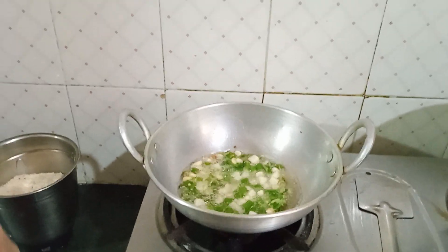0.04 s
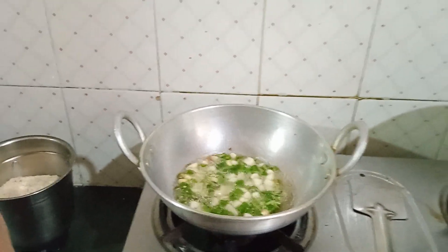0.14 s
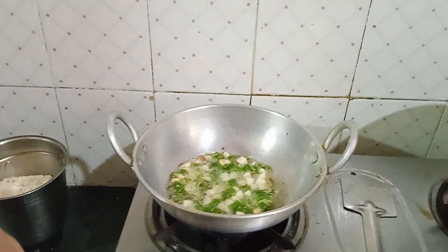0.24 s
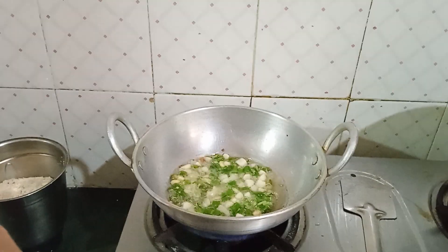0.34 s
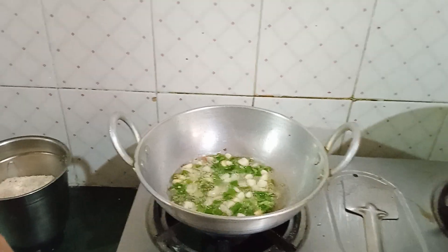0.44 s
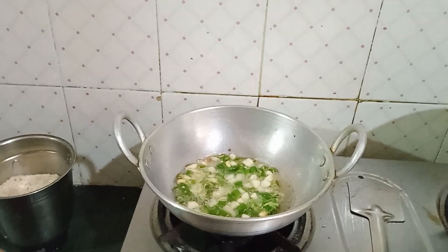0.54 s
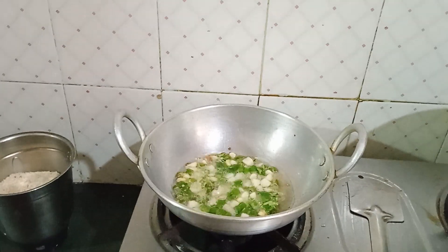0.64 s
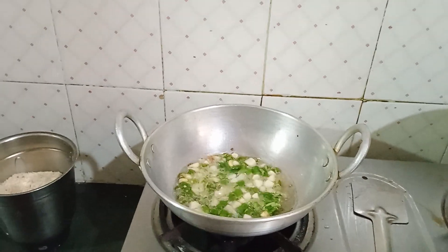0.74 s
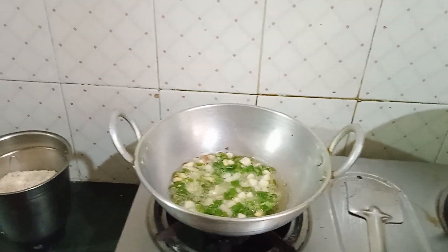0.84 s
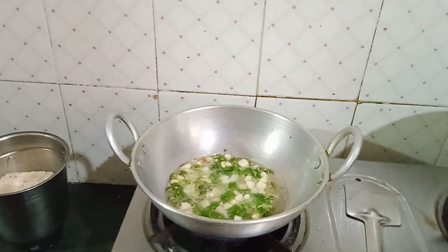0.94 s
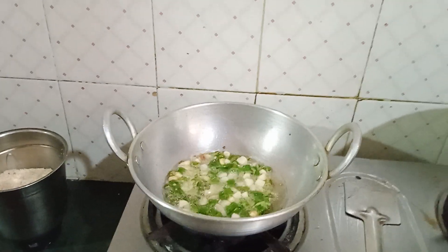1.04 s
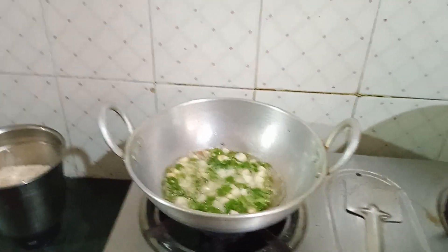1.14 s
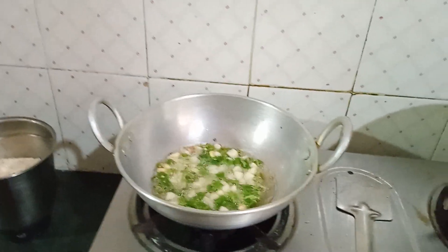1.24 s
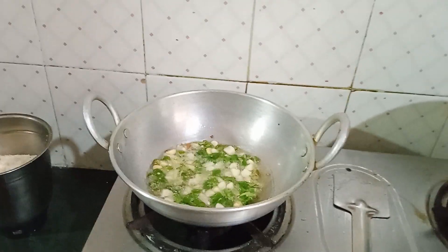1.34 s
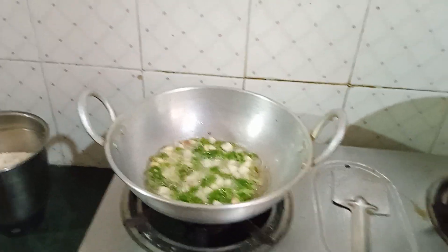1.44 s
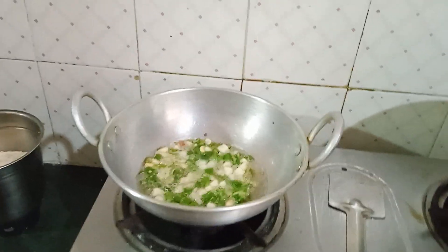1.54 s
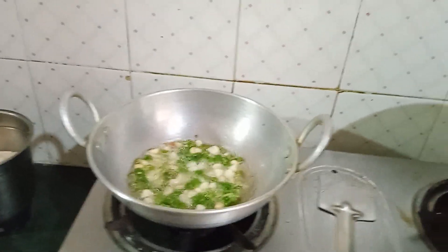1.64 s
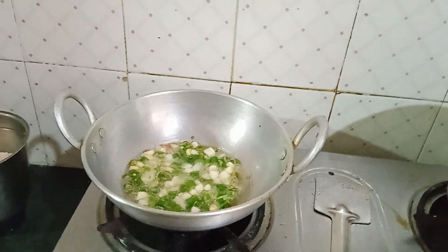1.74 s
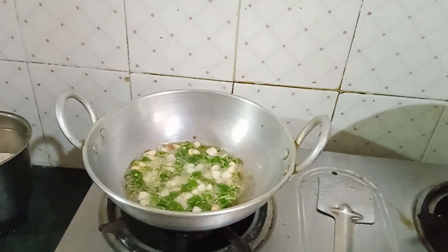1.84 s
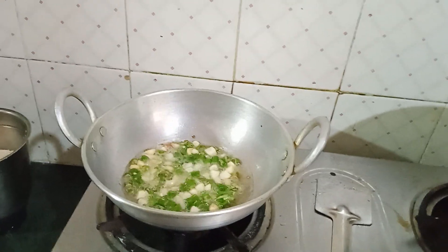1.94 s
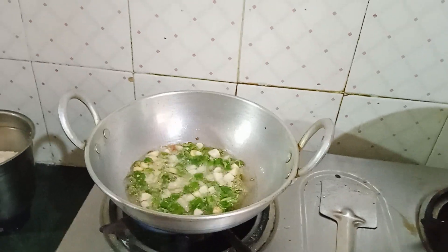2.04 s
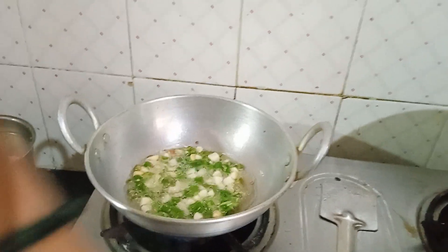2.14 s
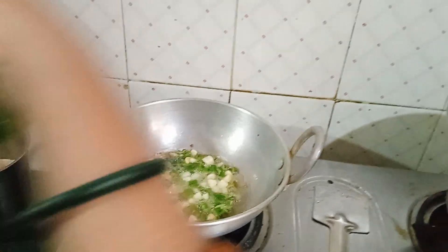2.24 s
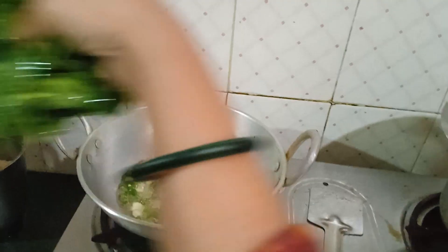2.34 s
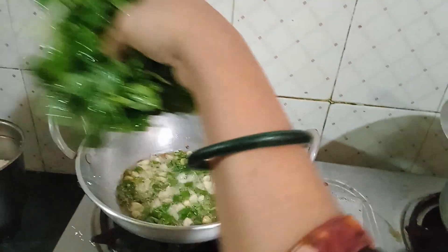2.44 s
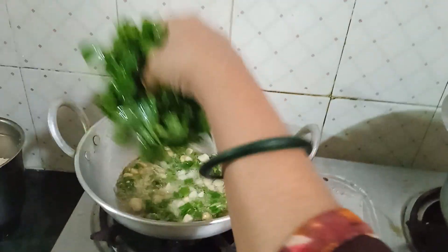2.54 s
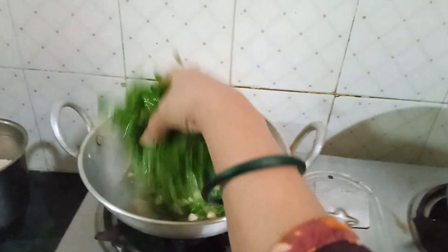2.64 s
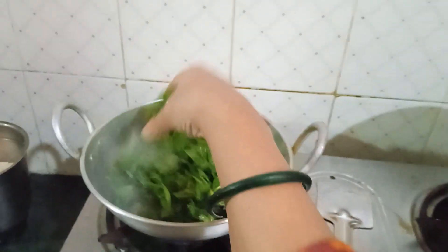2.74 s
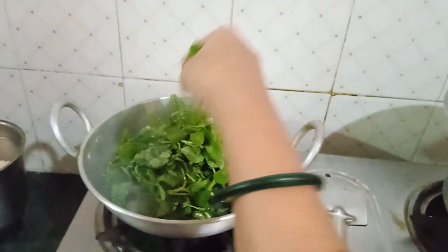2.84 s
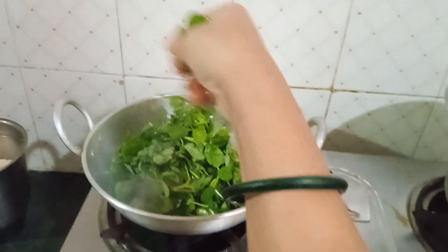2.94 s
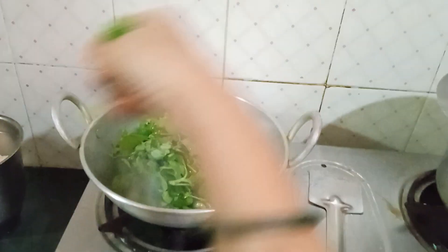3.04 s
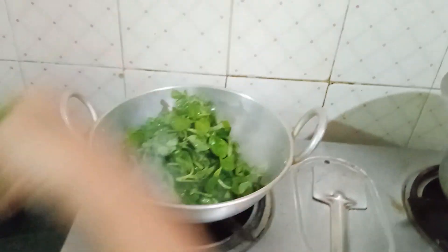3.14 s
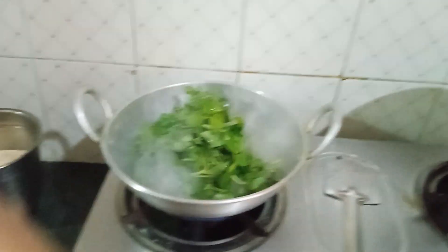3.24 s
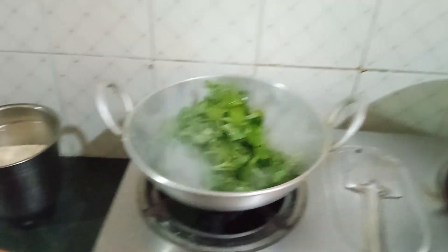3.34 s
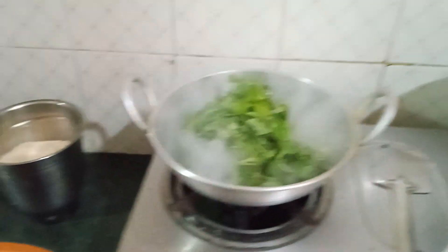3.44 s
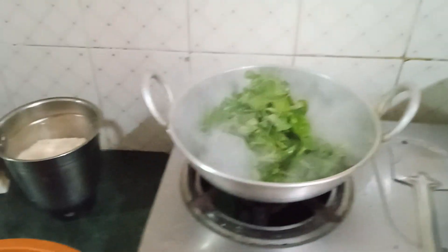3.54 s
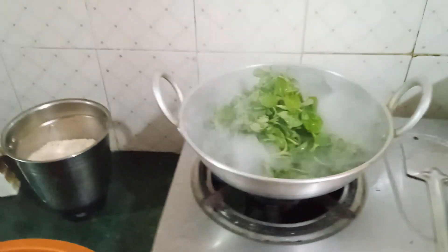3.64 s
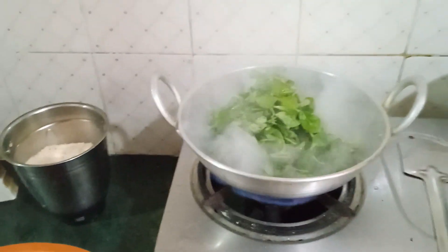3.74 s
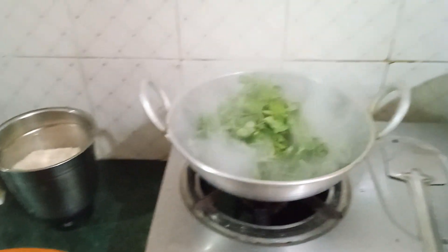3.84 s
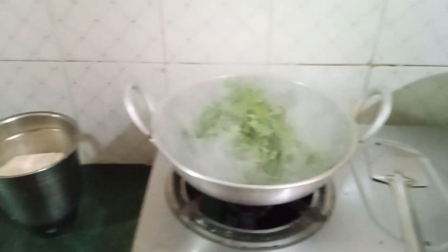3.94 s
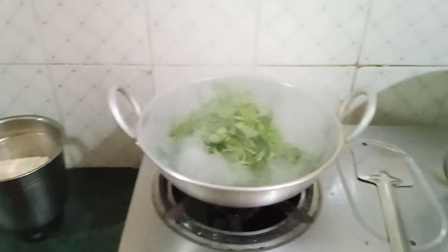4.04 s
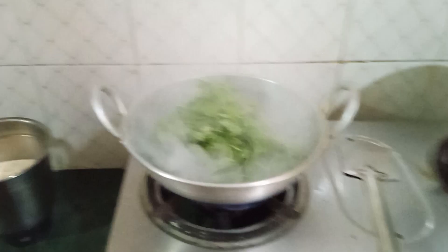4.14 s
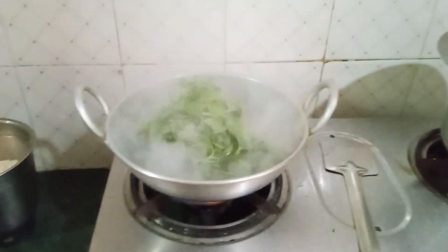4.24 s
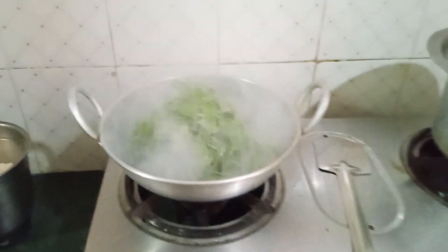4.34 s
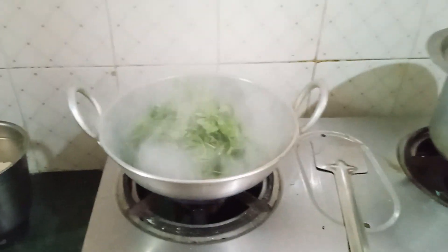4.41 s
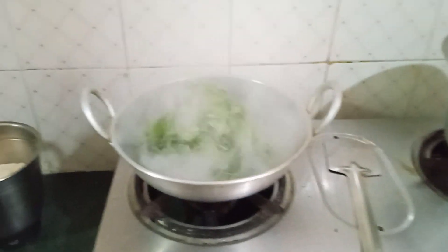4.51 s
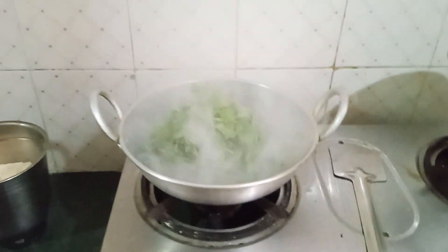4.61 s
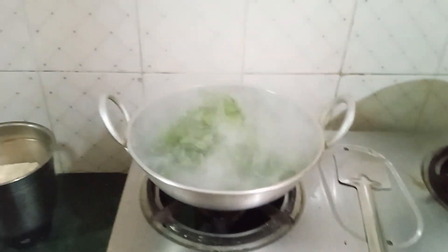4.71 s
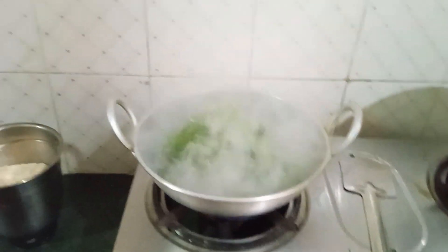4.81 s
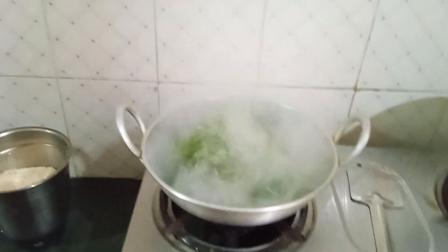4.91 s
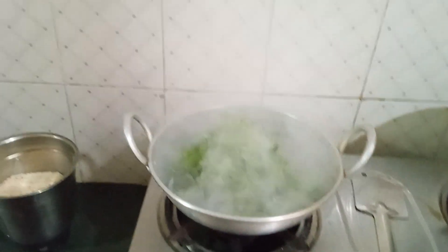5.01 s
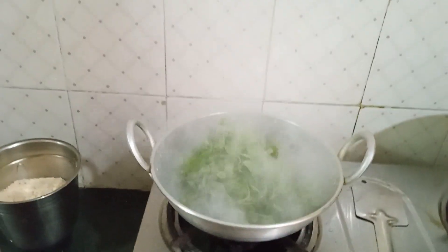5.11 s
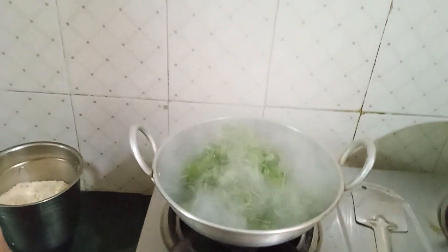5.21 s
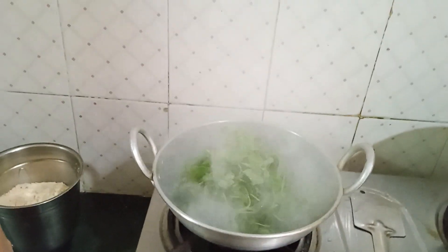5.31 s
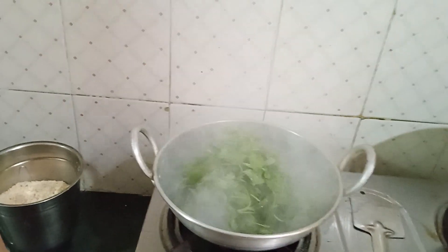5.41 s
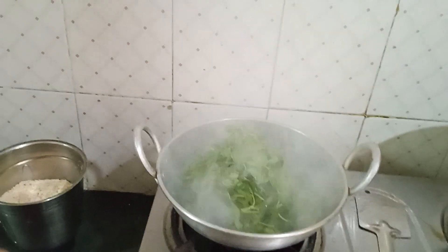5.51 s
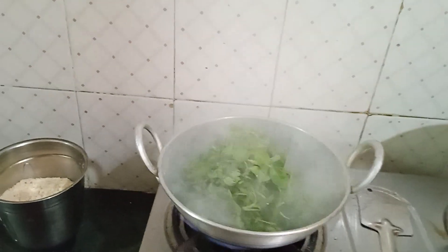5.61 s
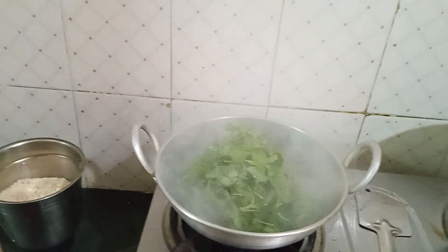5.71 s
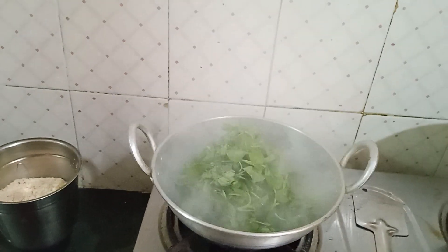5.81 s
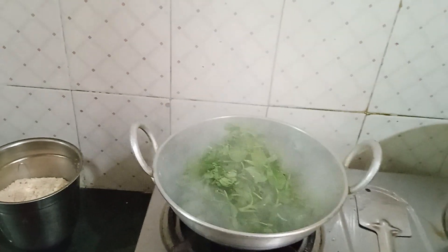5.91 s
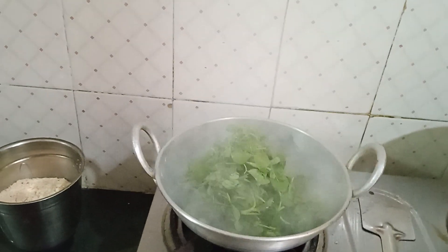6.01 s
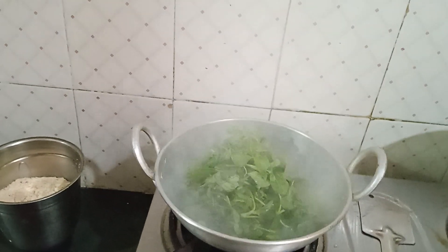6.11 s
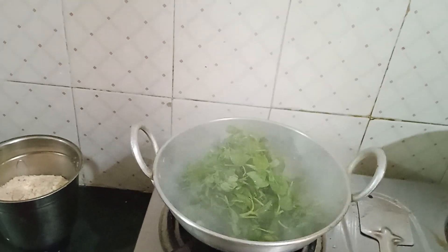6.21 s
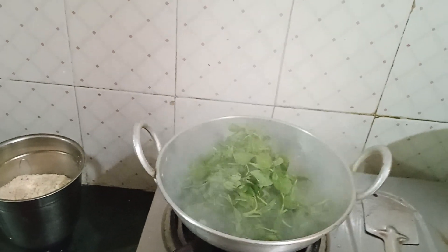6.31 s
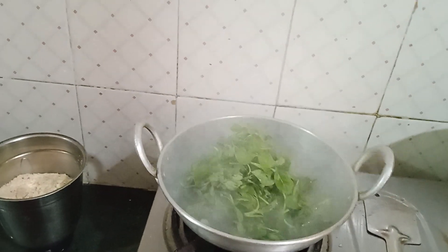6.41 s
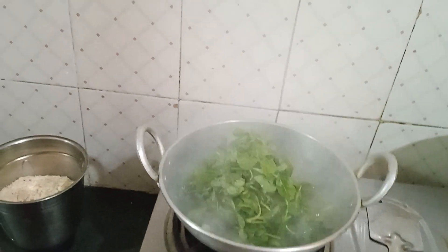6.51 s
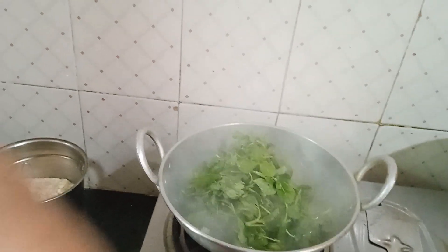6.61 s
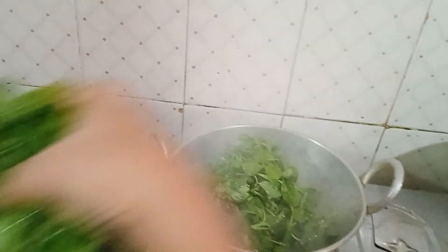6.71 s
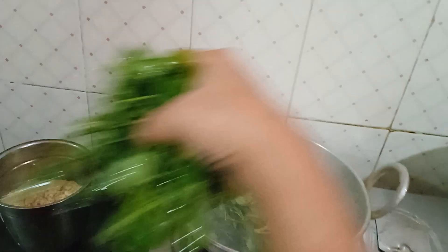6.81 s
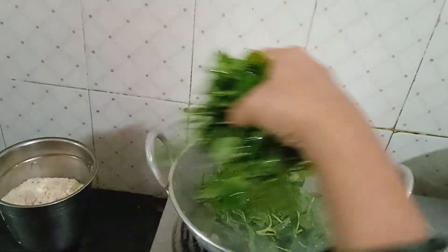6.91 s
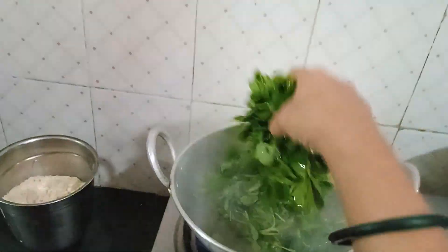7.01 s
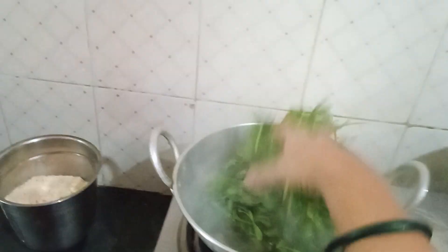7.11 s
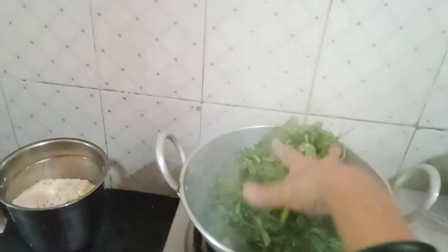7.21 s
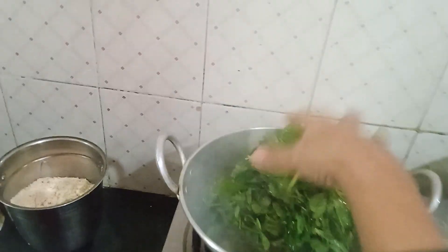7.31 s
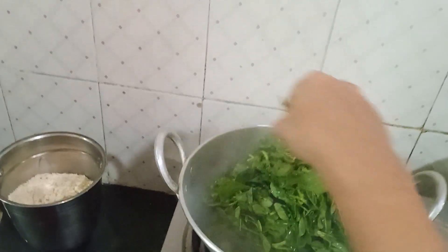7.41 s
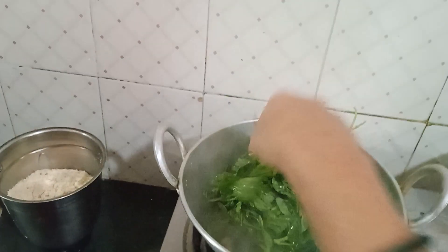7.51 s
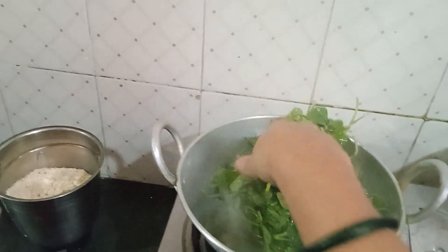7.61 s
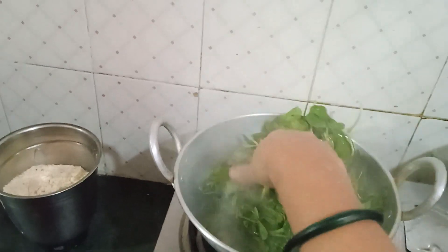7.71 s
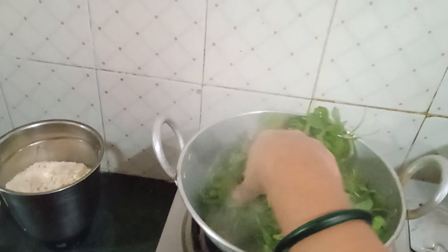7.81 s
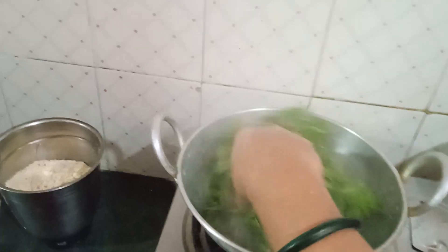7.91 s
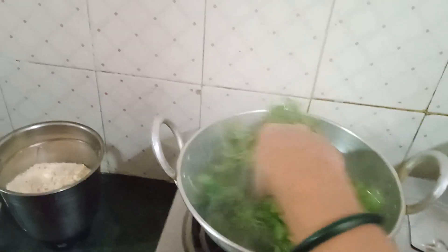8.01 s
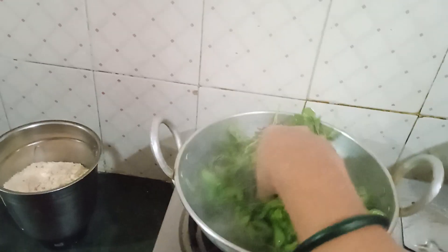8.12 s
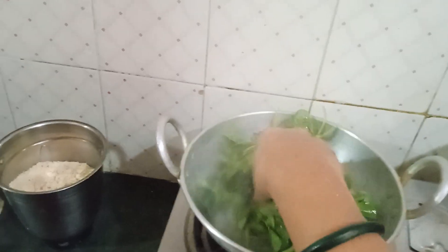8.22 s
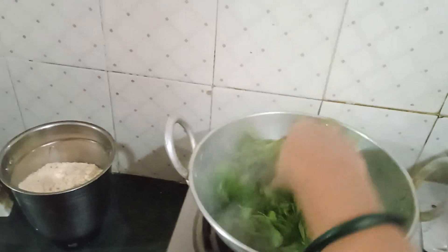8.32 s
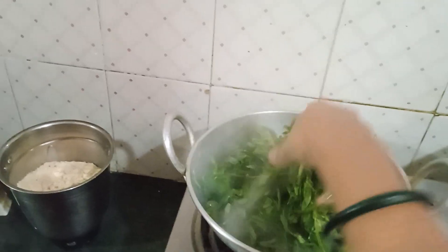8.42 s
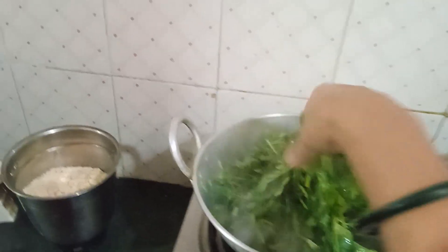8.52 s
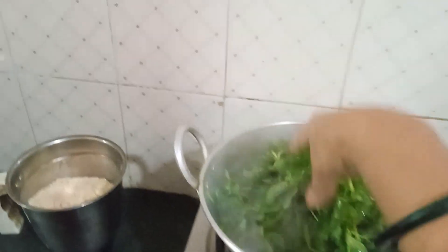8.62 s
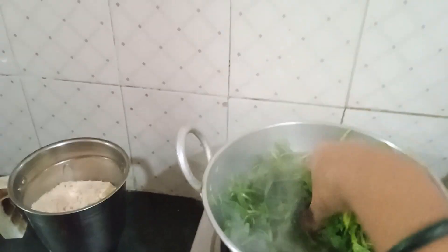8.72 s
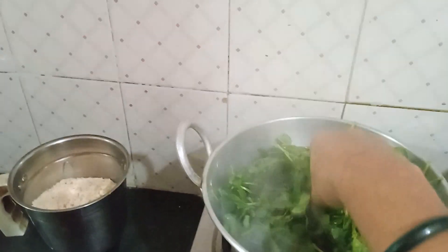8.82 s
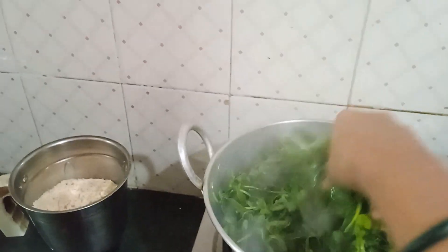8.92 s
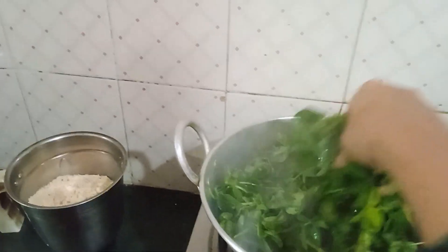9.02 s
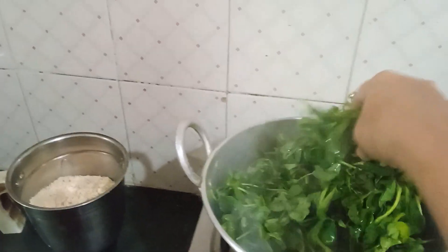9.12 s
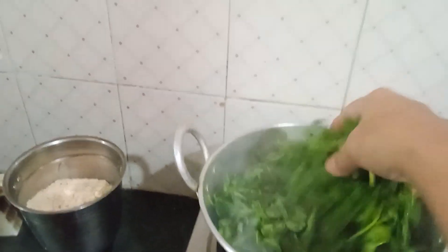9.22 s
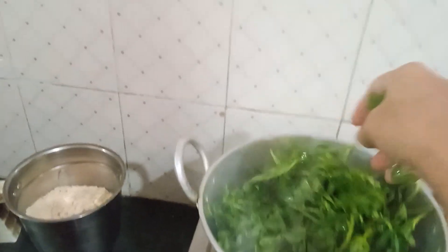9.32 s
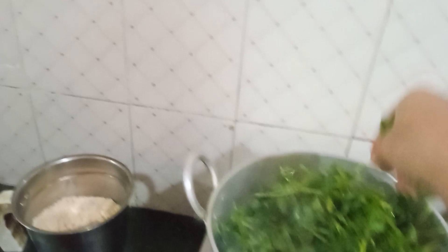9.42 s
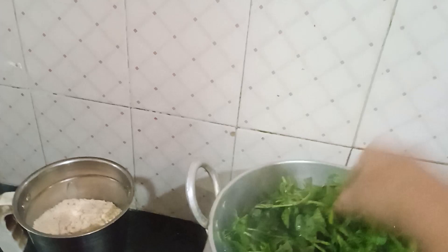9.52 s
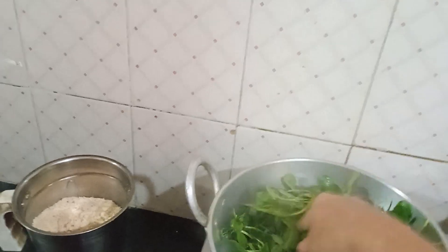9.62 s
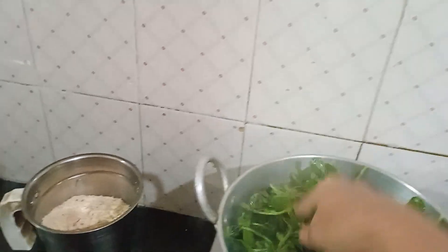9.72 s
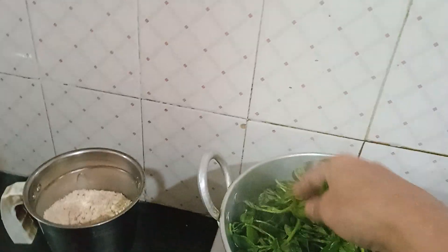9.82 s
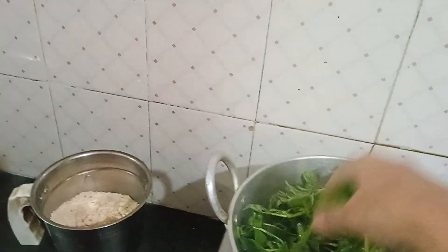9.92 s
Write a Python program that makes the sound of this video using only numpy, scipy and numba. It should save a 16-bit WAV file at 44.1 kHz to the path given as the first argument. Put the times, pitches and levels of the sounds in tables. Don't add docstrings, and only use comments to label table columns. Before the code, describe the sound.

A phone microphone sits close to a metal pan in a tiled kitchen, with a faint low motor droning far off. From 0 to 2.5 seconds, chopped aromatics simmer quietly in hot oil, with small bubbles, fine ticks and sharp spits; a dense crackling flurry bursts around 0.45 to 0.65. At about 2.6, wet leaves drop in: a bright, fine spray of steam surges up, becoming a fuller, loud sizzling roar by 3.2. It gradually settles through 6.6 into steady, grainy frying, with soft low bubbles near 5.4 and 5.7. Around 6.75 a second heap briefly dulls the sizzle, leaving it denser and more muffled. A short steam hiss comes at 7.2, then distinct pops near 7.5, 7.9 and 9.5, with faint metallic hums as a hand jogs the pan. Frying continues steadily to 10 seconds.

```python
import sys
import numpy as np
from scipy import signal
from scipy.fft import rfft, irfft, next_fast_len
from scipy.io import wavfile
from scipy.ndimage import uniform_filter1d, map_coordinates
from numba import njit

SR = 44100
rng = np.random.default_rng(int(sys.argv[2]) if len(sys.argv) > 2 else 0)


def unload_wav(signal):
    wavfile.write(
        sys.argv[1],
        SR,
        np.round(np.clip(np.atleast_2d(signal).T, -1, 1) * 32767).astype(np.int16),
    )


def elevation(decibels):
    levels = np.asarray(decibels, float)
    return 10 ** (levels / 20)


N = 438794

# time in seconds, share of first leaves 0-1, share of the heaped pan 0-1
LOAD = [
    (0, 0, 0),
    (2.56, 0, 0),
    (2.68, 1, 0),
    (6.64, 1, 0),
    (6.78, 0, 1),
    (10, 0, 1),
]
# time in seconds, vigour in dB, fineness in dB
BOIL = [(0, -55, -1.5), (.6, -53, 0), (1.3, -55.5, -0.5), (2, -53.5, 1), (2.4, -56.5, -2), (2.56, -54.5, 0),
        (2.72, -42.5, 7.5), (2.8, -36, 7), (3, -33, 7), (3.18, -28.5, 2), (3.42, -30, 0.5),
        (3.85, -31.5, -0.5), (4.5, -33.5, .8), (5.6, -35, 1.5), (6.66, -36, 0.5), (7.3, -35, 0.6),
        (8.1, -36, 1), (9.95, -36.5, -1)]
# frequency in Hz, level in dB per Hz
SIMMER = [(330, -37), (560, -10), (762, -21), (995, -13.5), (1220, -7.5), (1590, -4), (2050, -4),
          (2250, -2), (3950, -4), (4830, -3), (6930, -1), (9810, -18), (13700, -15)]
FRESH = [(330, -32.5), (560, -20), (703, -23), (906, -13.5), (995, -8), (1180, -12), (1470, -5), (1750, -6),
         (2220, 0), (4000, -5), (7210, -4), (9170, -14), (13700, -11.5)]
HEAPED = [(330, -57), (560, -23.5), (684, -19.5), (762, -18.5), (969, -6), (1230, -7.5), (1390, -7),
          (1630, -4.5), (2110, -0.5), (4220, -5.5), (6930, -6.5), (9290, -20), (13700, -20.5)]
# frequency in Hz, width in Hz, level in dB above the colour
BOWL_BARE = [(1007, 75, 10.5), (1630, 66, 4.5), (1880, 84, 2.5), (2560, 100, 5), (3290, 140, -31)]
BOWL_FRESH = [(1080, 220, -2.5), (1570, 170, 5), (2230, 200, -1.5), (2890, 230, -1), (3680, 140, -1.5)]
BOWL_HEAPED = [(1397, 37, 6), (1470, 64, 5), (2070, 140, 1.5), (2630, 270, 2), (3270, 740, -1)]
# frequency in Hz, width in Hz, level in dB above the colour
WALL = [(687, 9, 13.5), (973, 12, 4.5), (832, 20, 3), (1352, 14, 2), (745, 20, 2)]
RANGE_EDGES_HZ = (3500, 8200, 13900)
BARE_DB = [-1.05, -1.5, -6, -16]
FRESH_DB = [0.1, -2, -9.5, -15]
HEAPED_DB = [-0.1, -5.5, -8.5, -14]
FINENESS_LEAN = [0, .7, .9, 1.4]
# start in seconds, length in seconds, pitch in Hz, width in Hz, level in dB
JETS = [(0.36, .1, 2600, 3100, -55), (0.58, .05, 2600, 1600, -54), (0.974, .006, 6100, 8000, -40.5),
        (1.5, .015, 6100, 2200, -42), (2.605, .15, 4800, 700, -45.5), (2.652, 0.18, 2600, 790, -42),
        (2.61, 0.12, 6600, 1200, -43), (7.209, 0.11, 3700, 1000, -35.5), (7.215, 0.055, 9400, 10000, -35.5),
        (2.84, .25, 2900, 1800, -40), (2.775, .12, 8700, 8500, -37), (2.94, .4, 6000, 2300, -33.5),
        (.39, 0.059, 4500, 6000, -46), (7.914, 0.017, 1900, 1200, -37)]
# time in seconds, peak in dB, pitch in Hz
SPITS = [(0.0523, -34, 2600), (0.0902, -34, 3220), (0.203, -33, 6390), (0.281, -35, 3120),
         (0.2927, -30, 3760), (0.413, -30, 2780), (0.783, -38, 2580), (0.7884, -36, 2380),
         (.8885, -39, 8000), (0.975, -41, 1660), (1.0093, -31, 6450), (1.0824, -34, 1140),
         (1.1667, -38, 7400), (1.3247, -31, 6050), (1.4167, -38, 5550), (1.4296, -42, 6300),
         (1.5564, -34, 7100), (1.6224, -33, 2770), (1.67, -34, 6070), (1.874, -29, 5000),
         (1.8803, -29, 4860), (2.0493, -38, 2470), (2.4069, -37, 6600), (2.5817, -36, 6800),
         (2.6095, -32, 4670), (2.6184, -37, 6900), (7.4768, -18, 2470), (7.9115, -15, 1900),
         (9.5226, -21, 2380)]
# time in seconds, peak in dB, pitch in Hz
FLURRY = [(0.455, -34, 4900), (0.494, -21.5, 6800), (.4945, -26, 4300), (0.5027, -26, 3270),
          (0.532, -28, 5910), (0.5437, -27, 7050), (0.549, -20.5, 3900), (0.5664, -30, 7300),
          (0.583, -29, 1630), (0.601, -33, 3110), (0.615, -20, 3100), (0.627, -28.5, 1690),
          (0.6374, -31, 2230), (0.66, -33, 2780)]
# time in seconds, peak in dB
MIST_TICKS = [(0.3446, -42), (0.395, -42), (0.5826, -34), (0.625, -38), (0.8485, -46), (0.8639, -34),
              (0.9757, -36), (1.04, -45), (1.5768, -41), (1.7789, -36), (1.95, -39), (2.0238, -42)]
# time in seconds, peak in dB, pitch in Hz, t60 in seconds
GULPS = [(0.245, -45, 1150, 0.028), (0.428, -44, 974, 0.03), (0.515, -37, 736, 0.038),
         (0.535, -38, 759, 0.027), (0.548, -42, 770, 0.026), (0.564, -46, 780, 0.023),
         (0.592, -39, 815, 0.037), (0.763, -45, 842, 0.03), (0.825, -47, 1040, 0.03),
         (1.082, -40.5, 1190, 0.025), (5.409, -31.5, 920, 0.026), (5.724, -29.5, 765, 0.044)]
# time in seconds, level in dB
NUDGES = [(7.085, -46), (7.5, -49), (7.815, -44), (7.865, -39), (7.97, -41), (8.85, -52), (9.5, -46)]
# frequency in Hz, level in dB per Hz
KITCHEN = [(18, -42), (30, -20), (108, -1), (194, -3), (230, -0.5), (328, -4.5), (423, -6.5), (495, -3.5),
           (717, -8.5), (900, -2), (1170, -21), (1980, -120)]
# frequency in Hz, width in Hz, level in dB above the rumble
MOTOR = [(84, 10, 7), (103.8, 4.8, 12), (156, 6.4, -8), (174, 10, 6.5), (187.6, 7.5, 10),
         (202.7, 5.4, 13.5), (267, 9, 0), (313.4, 6.8, 9), (343, 14, 8.5), (429, 15.4, 11)]
# frequency in Hz, level in dB
HUM = [(486, -72), (522.5, -71)]
# frequency in Hz, t60 in seconds
TILES = [(500, 0.35), (3000, 0.18), (12000, 0.041)]
# frequency in Hz, gain in dB
PORT = [(13700, 0), (14000, 1), (14300, 5), (14900, 9), (15710, 11), (15770, -25), (15900, -70)]
# centre in seconds, low edge in Hz, high edge in Hz, level in dB
FILLS = [(2.835, 4600, 6400, -38), (3.348, 9600, 11300, -49), (3.372, 12500, 14000, -47),
         (4.252, 4600, 5900, -42), (4.622, 11700, 13300, -53), (4.718, 13800, 15700, -47),
         (5.695, 11000, 12500, -52), (5.833, 4160, 5300, -47), (5.833, 6900, 9000, -45),
         (5.833, 10300, 14000, -49), (6.458, 4130, 5200, -44.5), (6.692, 5050, 6460, -44),
         (6.692, 8900, 10500, -53), (8.108, 4600, 5900, -50), (9.314, 13000, 14700, -53),
         (9.338, 4600, 7100, -46), (9.432, 6740, 9800, -47), (9.71, 4600, 7800, -47),
         (9.782, 7500, 9050, -52), (9.782, 13800, 15300, -52)]

ARM_S, ARM_LENGTH_S, ARM_DB = 6.71, 0.16, -1.5
HAND_OFF_S, HAND_DB = 7.2, -0.84
FAINT_DB, FAINT_SPREAD_DB, FAINT_UNTIL_S = -49, 5, 2.3
SPATTER_DB, SPATTER_FALLS = -1.5, 0.37
NUDGE_T60_S, NUDGE_RISE_S = 0.16, 0.0075
KITCHEN_DB, ROAR_DB, SHADE_DB = -62, 4, -7
SWELL_S, SWELL_LENGTH_S, SWELL_DB = 4.12, 0.099, 4.5


def unit(x):
    return x / np.sqrt(np.mean(x ** 2, axis=-1, keepdims=True) + 1e-20)


def along(points, hz):
    f, v = np.transpose(points)
    return np.interp(np.log(hz + 1), np.log(f + 1), v)


def curves(rows):
    s, *columns = np.transpose(rows)
    return np.array([np.interp(np.arange(N) / SR, s, column) for column in columns])


def wobble(rate):
    knots = rng.standard_normal(int(N * rate / SR) + 4)
    return map_coordinates(knots, [np.arange(N) * rate / SR])


def peaked(spectrum, modes, hz):
    power = 1 + sum(elevation(2 * db) / (1 + (2 * (hz - centre) / width) ** 2) for centre, width, db in modes)
    return elevation(along(spectrum, np.minimum(hz, 13700))) * np.sqrt(power)


def coloured(x, gain):
    size = 2 ** 14
    cepstrum = irfft(np.log(gain(np.fft.rfftfreq(size, 1 / SR)) + 1e-6))
    cepstrum[1:size // 2] *= 2
    cepstrum[size // 2 + 1:] = 0
    return signal.fftconvolve(x, irfft(np.exp(rfft(cepstrum))))[:N]


def burst(length, low_hz, high_hz):
    hz = np.fft.rfftfreq(length, 1 / SR)
    inside = (hz > low_hz) & (hz < high_hz)
    return unit(irfft(rfft(rng.standard_normal(length)) * inside, length))


@njit
def add(out, s, hz, size, cycles):
    for i in range(len(s)):
        k = int(s[i] * SR)
        for j in range(min(int(5 * cycles[i] * SR / hz[i]), len(out) - k)):
            u = j * hz[i] / SR
            out[k + j] += size[i] * np.sin(2 * np.pi * u) * np.exp(-u / cycles[i]) * (1 - np.exp(-u))
    return out


def frying():
    fresh, heaped = curves(LOAD)
    vigour_db, fineness_db = curves(BOIL)
    t = np.arange(N) / SR
    since = np.clip(t - ARM_S, 0, 5) / ARM_LENGTH_S
    arm_db = ARM_DB * np.e * 2 * since * np.exp(-2 * since)
    covered = np.clip(np.minimum(since * ARM_LENGTH_S, HAND_OFF_S - t) / 0.018, 0, 1)
    vigour_db = vigour_db + HAND_DB * covered - 0.3 * arm_db
    fineness_db = fineness_db + arm_db

    bare = bubbles(count=8000, cycles=4.8, scatter_db=4.0, share=0.16, patch_db=1.6)
    wet = bubbles(count=40000, cycles=2.45, scatter_db=3.5, share=0.16, patch_db=1.0)
    full = bubbles(count=40000, cycles=4.9, scatter_db=6.5, share=0.15, patch_db=1.0)
    bare = coloured(bare, lambda f: peaked(SIMMER, BOWL_BARE, f))
    wet = coloured(wet, lambda f: peaked(FRESH, BOWL_FRESH + WALL, f))
    full = coloured(full, lambda f: peaked(HEAPED, BOWL_HEAPED + WALL, f))
    mix = np.sqrt(np.abs(1 - fresh - heaped)) * bands(bare, BARE_DB)
    mix += np.sqrt(fresh) * bands(wet, FRESH_DB)
    mix += np.sqrt(heaped) * bands(full, HEAPED_DB)

    surge_db = 0.1 * wobble(3.03) + 0.41 * wobble(9) + 0.5 * wobble(30) + 0.13 * wobble(90)
    flicker = np.array([1.2 * wobble(4) + wobble(14) + wobble(60) for _ in range(4)])
    own_db = [[0.3], [0.3], [0.35], [0.6]] * flicker
    level_db = vigour_db + np.outer(FINENESS_LEAN, fineness_db) + surge_db + own_db
    return np.sum(mix * elevation(level_db), axis=0)


def bubbles(count, cycles, scatter_db, share, patch_db):
    when, pitch, strength, ringing = rng.random((count, 4)).T
    hz = 600 * 27 ** pitch
    size = hz * elevation(scatter_db * np.sqrt(-np.log(1 - 0.998 * strength)))
    grains = add(np.zeros(N), when * N / SR, hz, size, cycles * (0.5 + ringing))
    share = np.clip(share, 0, 1)
    hiss = rng.standard_normal(N)
    return patchy(np.sqrt(share) * unit(grains) + np.sqrt(1 - share) * hiss, patch_db)


def patchy(x, depth_db):
    z = signal.stft(x, nperseg=512)[2]
    field = uniform_filter1d(rng.standard_normal(z.shape), size=3, axis=0)
    field = uniform_filter1d(field, size=12, axis=1)
    return signal.istft(z * elevation(depth_db * field / field.std()), nperseg=512)[1][:N]


def bands(x, levels_db):
    m = next_fast_len(N)
    hz = np.fft.rfftfreq(m, 1 / SR)
    a, b, c = (1 / (1 + (hz / edge) ** 10) for edge in RANGE_EDGES_HZ)
    ranges = irfft(rfft(x, m) * [a, b - a, c - b, 1 - c], m)[:, :N]
    return unit(ranges) * elevation(levels_db)[:, None]


def jets():
    out, t = np.zeros(N + SR), np.arange(SR // 2) / SR
    for s, length, hz, width, db in JETS:
        shape = (1 - np.exp(-t / (0.073 * length))) * np.exp(-t / length)
        hiss = burst(len(t), hz - width / 2, hz + width / 2)
        out[round(s * SR):][:len(t)] += elevation(db) * shape * hiss
    return out[:N]


def spits():
    s, db, hz = np.transpose(SPITS + FLURRY + faint(count=30))
    spatter_db = SPATTER_DB - SPATTER_FALLS * (db + 35)
    out = add(np.zeros(N), s, hz, elevation(db + 2.5), 0.84 + hz * 0.00056)

    late = rng.exponential(1, (len(s), 14))
    pitch = np.clip(hz[:, None] * np.exp(0.234 * rng.standard_normal(late.shape)), 500, 12000).ravel()
    size = elevation((db + spatter_db)[:, None] - 12 - 5.7 * late)
    out = add(out, (s[:, None] + 0.004 * late).ravel(), pitch, size.ravel(), 1.5 + pitch * 0.0008)

    t = np.arange(400) / SR
    snaps = np.zeros(N + len(t))
    for at, level in zip(s, db + spatter_db):
        snaps[round(at * SR):][:len(t)] += elevation(level - 60 * t / 0.017) * rng.standard_normal(len(t))

    chance = rng.random((50, 2)) * [FAINT_UNTIL_S, 8] + [0, -51]
    at, level = np.transpose(MIST_TICKS + list(chance))
    out = add(out, at, rng.uniform(12500, 15500, len(at)), elevation(level + 9), np.full(len(at), 1.5))
    return out + coloured(snaps[:N], lambda f: peaked(SIMMER, BOWL_BARE, f) * elevation(-4))


def faint(count):
    when, size, pitch = rng.random((count, 3)).T
    return list(zip(when * FAINT_UNTIL_S, FAINT_DB + FAINT_SPREAD_DB * size, 2300 * 3.3 ** pitch))


def gulps():
    out, t = np.zeros(N + SR), np.arange(SR // 5) / SR
    for s, db, hz, t60 in GULPS:
        shape = elevation(db + 5 - 60 * t / max(t60, 0.01)) * (1 - np.exp(-t / 0.0021))
        out[round(s * SR):][:len(t)] += shape * np.sin(2 * np.pi * hz * (t + 0.87 * t * t))
    return out[:N]


def nudges():
    out, t = np.zeros(N + SR), np.arange(SR // 3) / SR
    shape = elevation(-60 * t / NUDGE_T60_S) * (1 - np.exp(-t / NUDGE_RISE_S))
    ring = shape * np.sin(2 * np.pi * WALL[0][0] * t)
    for s, db in NUDGES:
        out[round(s * SR):][:len(t)] += elevation(db + 0.7) * ring
    return out[:N]


def kitchen():
    fresh, heaped = curves(LOAD)
    noise = patchy(rng.standard_normal(N), depth_db=1.5)
    drone = unit(coloured(noise, lambda f: peaked(KITCHEN, MOTOR, f)))
    t = np.arange(N) / SR
    tones = np.zeros(N)
    for hz, db in HUM:
        level = elevation(db + 2.0 + 0.64 * wobble(5.5))
        tones += level * np.sin(2 * np.pi * hz * t + 0.8 * wobble(3.4))
    swell_db = SWELL_DB * np.exp(-((t - SWELL_S) / SWELL_LENGTH_S) ** 2)
    drift_db = 0.66 * wobble(2.2) + 1.5 * wobble(8)
    level_db = KITCHEN_DB + ROAR_DB * (fresh + heaped) + swell_db + drift_db
    return drone * elevation(level_db) + tones * elevation(SHADE_DB * heaped)


def tiles(x):
    hz, t, z = signal.stft(rng.standard_normal(SR // 2), SR, nperseg=256)
    decay = elevation(-60 * t / along(TILES, hz)[:, None])
    tail = signal.istft(z * decay, SR, nperseg=256)[1]
    return signal.fftconvolve(np.pad(x, (130, 0)), tail / np.linalg.norm(tail))[:N]


def fills():
    out, size = np.zeros(N + SR), 2048
    for s, low_hz, high_hz, db in FILLS:
        shape = elevation(db + 3) * np.hanning(size) ** 2
        out[round(s * SR) - size // 2:][:size] += shape * burst(size, low_hz, high_hz)
    return out[:N]


def scene():
    fry = frying() + jets()
    no_thump = signal.butter(3, 500, "high", fs=SR, output="sos")
    pops = signal.sosfilt(no_thump, spits()) + gulps() + nudges()
    mono = fry + pops + tiles(elevation(-8) * pops + elevation(-17) * fry) + kitchen()
    return np.array([mono, mono])


def top_cut(x):
    return signal.sosfilt(signal.butter(12, 16990, fs=SR, output="sos"), x)


def record(dry):
    heard = coloured(dry[0], lambda f: elevation(along(PORT, f)))
    apart = fills()
    return top_cut(np.array([heard + apart, heard - apart]))


dry = scene()
out = record(dry)
unload_wav(out)
```